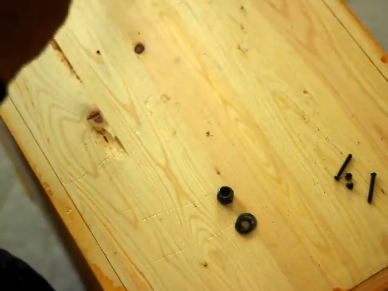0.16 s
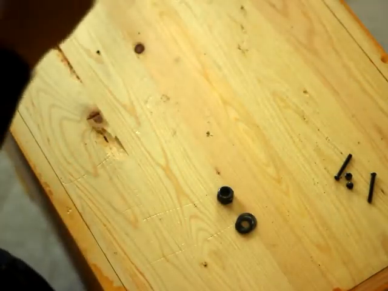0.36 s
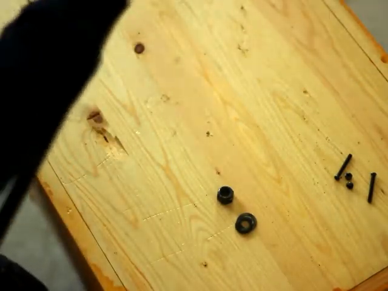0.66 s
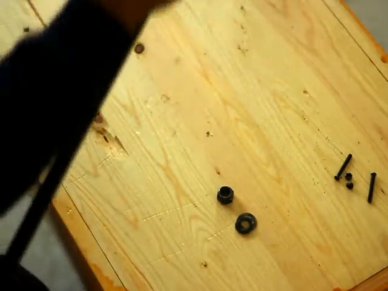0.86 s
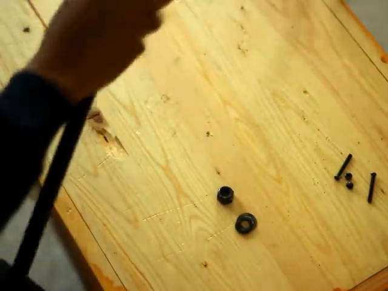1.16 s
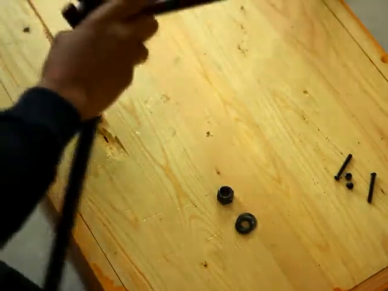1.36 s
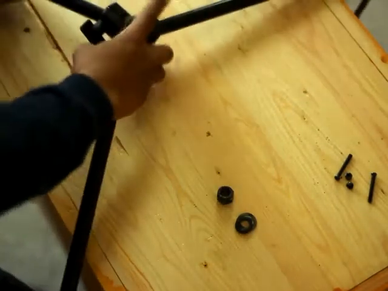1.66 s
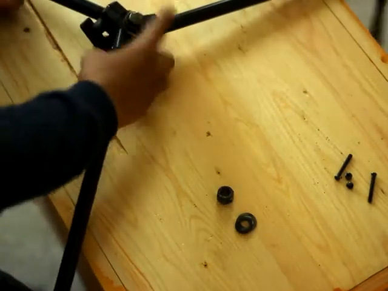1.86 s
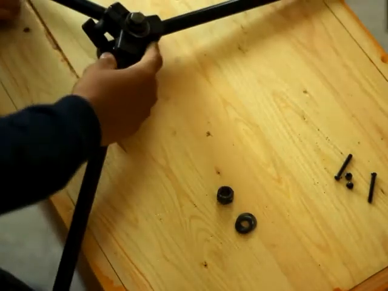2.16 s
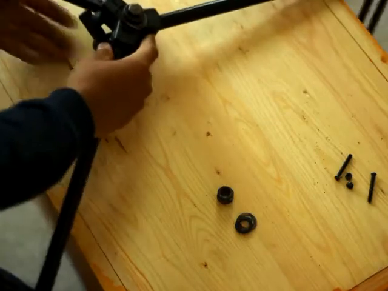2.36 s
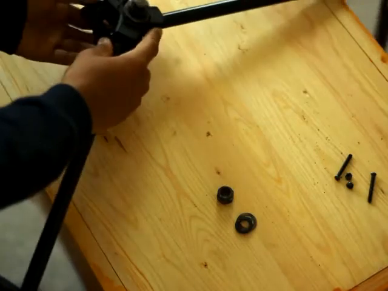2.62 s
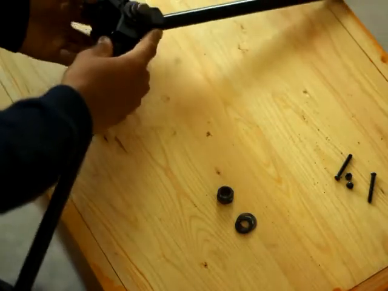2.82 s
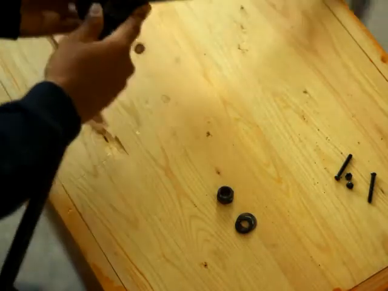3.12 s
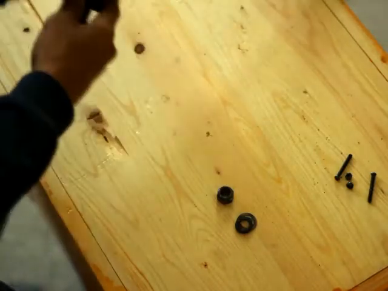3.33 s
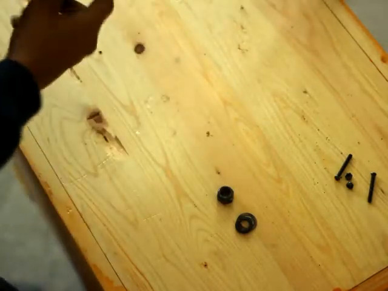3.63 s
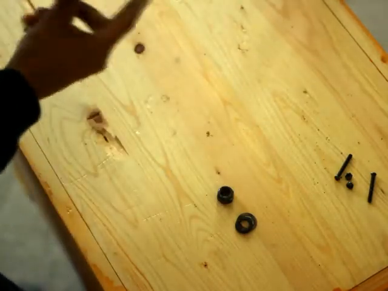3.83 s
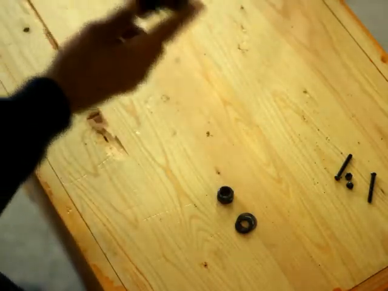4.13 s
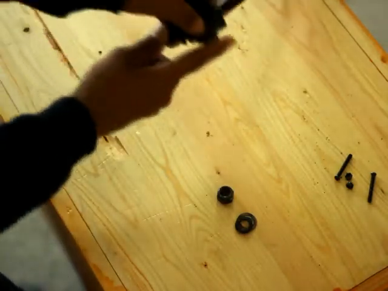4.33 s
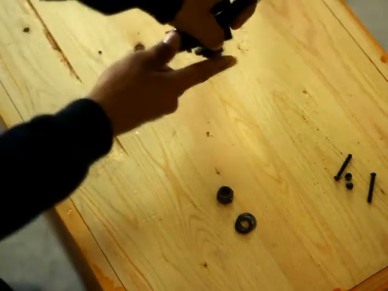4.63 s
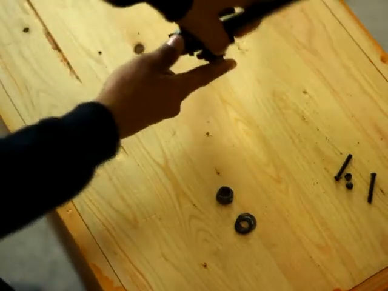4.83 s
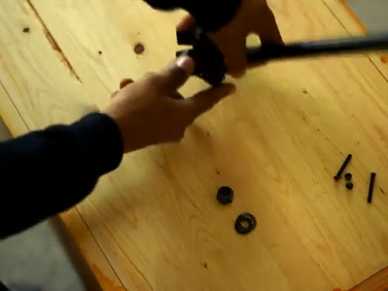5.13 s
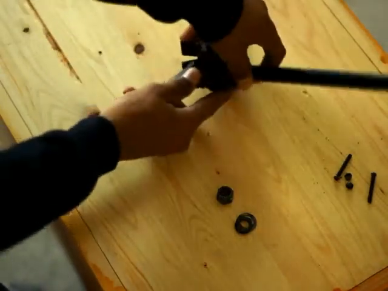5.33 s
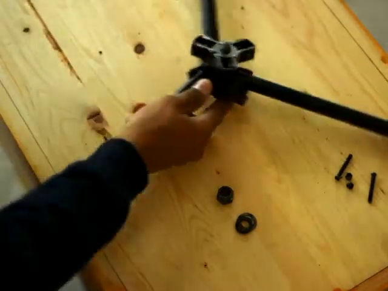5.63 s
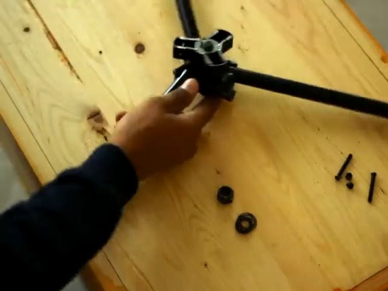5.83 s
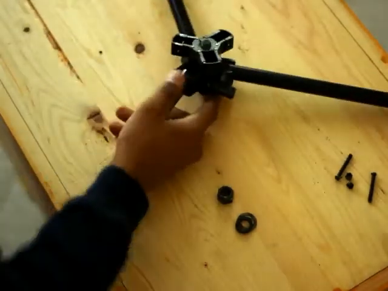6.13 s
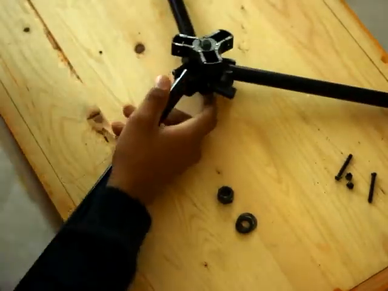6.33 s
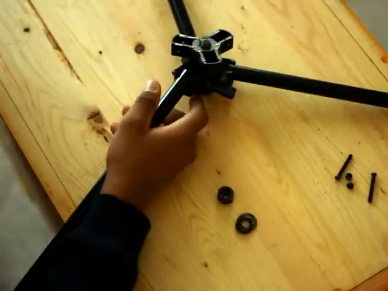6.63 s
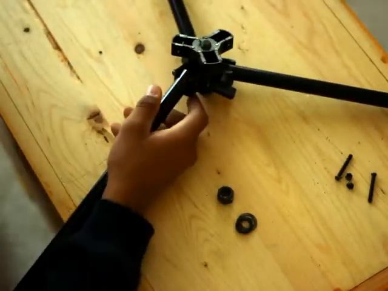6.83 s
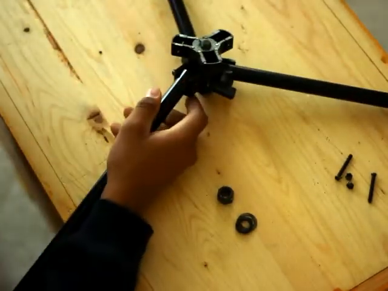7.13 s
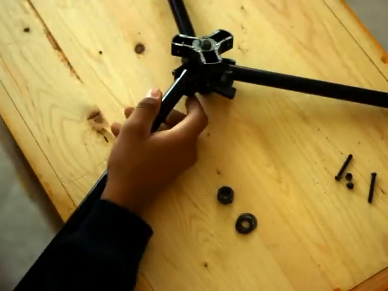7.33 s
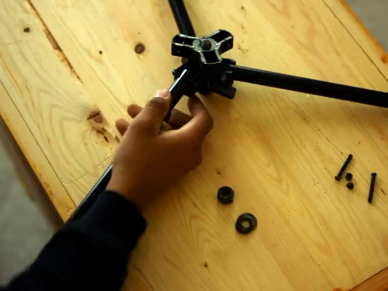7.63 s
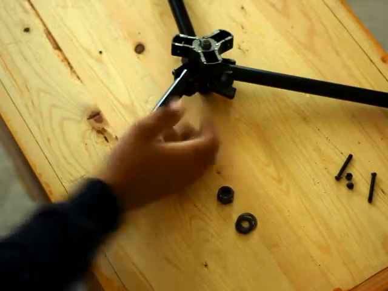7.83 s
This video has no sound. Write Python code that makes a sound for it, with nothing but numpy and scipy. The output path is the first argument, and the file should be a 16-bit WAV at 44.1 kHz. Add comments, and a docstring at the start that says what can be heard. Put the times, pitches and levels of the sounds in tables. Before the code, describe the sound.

Loose metal legs rattle in their hub, pause, then bang heavily onto wooden boards, ending with light taps and a small clear ring.

```python
"""Small room, wooden table, microphone close by: a three-legged stand of steel tubes is turned and set down.
Its ends knock on the boards as short thuds with ringing modes; the loose legs clatter and sing in their hub.
Near the end a small steel fitting pings with a few clear high modes. Sleeves and fingers are shaped noise,
and soft bumps are low decaying tones. A noise tail gives the room, a steady hiss lies underneath,
and the loudest blows overload the recorder."""
import sys
import numpy as np
from scipy import signal
from scipy.fft import rfft, irfft, next_fast_len
from scipy.io import wavfile
from scipy.ndimage import map_coordinates

SR = 44100
rng = np.random.default_rng(int(sys.argv[2]) if len(sys.argv) > 2 else 0)


def persist_wave(psi):
    """Save psi, clipped to +-1, as 16-bit WAV."""
    counts = np.round(np.clip(psi, -1, 1) * 32767).astype(np.int16)
    wavfile.write(sys.argv[1], SR, np.atleast_2d(counts).T)


N = 351477
T = np.arange(int(SR * 0.6)) / SR  # seconds after a blow

# All level_db columns are relative: the mix and the stereo balance scale them further.
# Steady hiss, spectrum shape: hz [Hz], density_db [dB per Hz]
HISS_SPECTRUM = [(15, -68), (25, -0.5), (126, -2.5), (381, -25), (556, -1.5), (954, -14), (1280, -6),
                 (1470, -5.5), (5820, -8), (10200, -6.5), (13100, -8.5), (14200, -14.5), (15800, -72.5)]
# Decay of the room: hz [Hz], t60_s [s]
ROOM_DECAY = [(100, 0.51), (300, 0.42), (1500, 0.3), (6000, 0.41), (14000, 0.22)]
# Rustle of sleeves, spectrum shape: hz [Hz], density_db [dB per Hz]
CLOTH_SPECTRUM = [(20, -17), (45, 2), (100, 3.5), (220, 3), (400, -3.5), (700, -7.5), (1500, -26),
                  (15000, -47)]
# Fingers rubbing on the tubes, spectrum shape: hz [Hz], density_db [dB per Hz]
RUB_SPECTRUM = [(100, -26), (400, 6), (570, 9.5), (850, 4.5), (1080, 8), (1500, 1.5), (2400, -2),
                (4000, -11.5), (15000, -21)]
# Strokes of the hands along the stand: start_s [s], length_s [s], cloth_db [dB], rub_db [dB]
HAND_STROKES = [(-.15,0.35,-45,-48.5), (.4,0.31,-70,-76), (1.055,.48,-31,-40), (1.442,0.42,-37,-42.5),
                (2.202,0.1,-65,-42), (2.114,0.6,-50,-54), (2.812,0.63,-47.5,-50.5), (3.5,0.87,-55.5,-57),
                (4.451,0.37,-37,-40.5), (5.348,0.23,-62,-40), (5.52,.55,-34,-35), (5.968,0.28,-43,-37),
                (6.126,0.68,-44.5,-50.5), (7.7,.2,-60,-59)]
# Soft bumps against the table: start_s [s], level_db [dB], pitch_hz [Hz], t60_s [s]
TABLE_BUMPS = [(0.072,-30,56.5,0.54), (.126,-41.5,91.3,0.63), (1.061,-27.5,85.4,0.26), (1.699,-35,82,0.18),
               (3.133,-38.5,93.4,0.32), (4.601,-35,82.7,0.74), (4.656,-27,123.5,0.35),
               (5.629,-10.5,79.5,0.073), (5.870,-4,71.4,0.014), (6.706,-30.5,52.7,0.13),
               (7.912,-29,132,0.096), (7.932,-25.5,60,0.1)]
# Touches of the small fitting: start_s [s], low_db [dB, low modes], middle_db [dB, near 6 kHz],
# high_db [dB, from 9 kHz up], touch_t60_s [s, damping by the fingers on top of each mode's own decay]
FITTING_PINGS = [(6.705, -36, -0.5, -15, 0.038), (6.712, -35, -24.5, -9.5, 0.7), (7, -41, -33.5, -58, 0.42),
                 (7.097, -41.5, -57, -68, 0.16), (7.295, -31, -36, -36, 4.5),
                 (7.464, -24, -29.5, -28, 0.11)]
# Modes of the fitting: pitch_hz [Hz], level_db [dB], t60_s [s]
FITTING_MODES = [(1740, -14, .2), (3378, -1, .45), (3420, -13, .3), (3747, -17, .5), (5911, -2, .33),
                 (5975, -4, .2), (7095, -20, .4), (7634, -17, .4), (8969, -9, .26), (9001, 0, .24),
                 (9098, -11, .24), (11170, -19, .35), (11960, -13, .22), (13170, -13, .25)]
# Pitched rings of the legs after contacts, brief or long, one row per mode:
# start_s [s], pitch_hz [Hz], level_db [dB], t60_s [s]
SINGING_LEGS = [(.144,1556,-33.5,0.22), (.506,2700,-36,0.026), (1.147,2110,-28,0.37),
                (1.149,15300,-21,0.33), (1.548,15050,-32,0.24), (1.329,587,-25,0.65), (1.377,1904,-27,0.27),
                (1.698,2450,-11,0.011), (1.703,1386,-28,0.31), (3.658,9460,-24.5,0.042),
                (3.659,2180,-31,0.16), (4.725,7600,-29,.14), (4.740,5940,-23.5,0.074),
                (5.132,599,-30.5,0.16), (5.451,3200,-36.5,0.33), (5.577,9800,-14,0.0088),
                (5.638,5917,-16.5,.25), (5.640,9330,-4,.11), (5.640,11200,-10.5,0.1),
                (5.643,4250,-7.5,0.062), (5.661,3200,-28,0.88), (5.885,3250,-29,0.27),
                (5.968,10150,-16.5,0.3), (5.969,15750,-6,.19), (5.972,3280,-4.5,0.06),
                (6.403,2600,-20,0.033), (6.433,2660,-15,0.027), (6.713,3760,-35.5,.5)]
# Neighbours of a singing mode: offset_hz [Hz], level_db [dB against that mode]
NEIGHBOUR_MODES = [(-36, -13.5), (36, -1.5), (109, -9)]
# Steel on steel: start_s [s], clank_db [dB, 2-7 kHz], clunk_db [dB, 0.6-2 kHz], sizzle_db [dB, above 7 kHz]
STEEL_CONTACTS = [(.143,-35,-33,-46), (0.504,-46,-41.5,-71), (0.98,-40,-36.5,-67), (1.062,-14,-8,-18),
                  (1.093,-27.5,-18,-20.5), (1.127,-16,-13.5,-20), (1.148,-9,-11,-7), (1.218,-28,-23,-26),
                  (1.284,-19,-36,-26.5), (1.331,-18.5,-18,-22), (1.376,-17,-13,-28), (1.548,-20.5,-21,-12),
                  (1.583,-22.5,-26,-21), (1.662,-26,-30.5,-37), (1.697,-10,-14.5,-46),
                  (1.704,-22,-26.5,-24), (1.917,-36,-35,-33), (1.976,-25.5,-34,-46), (2.809,-30,-26,-55),
                  (2.824,-19.5,-25,-29), (3.319,-36,-45.5,-62), (3.477,-32.5,-39.5,-59),
                  (3.531,-40,-34,-56), (3.641,-33,-30.5,-41), (3.659,-15,-22,-30), (3.884,-33,-35.5,-39.5),
                  (4.605,-31.5,-29.5,-31), (4.655,-13.5,-13.5,-20.5), (4.738,-22,-34,-30.5),
                  (4.873,-33.5,-33,-29), (5.131,-21,-21,-27), (5.296,-26.5,-31.5,-40), (5.43,-23,-21.5,-33),
                  (5.45,-21.5,-15.5,-31.5), (5.47,-22.5,-20.5,-25.5), (5.576,-26.5,-24.5,-38.5),
                  (5.626,-13,-1,-20.5), (5.641,-7.5,-30,-10.5), (5.675,-14.5,-7,-10.5),
                  (5.736,-8.5,-3.5,-15.5), (5.767,-15,-40,-15.5), (5.872,-20,-19,-22),
                  (5.885,-15.5,-47,-19.5), (5.968,-4.5,-10.5,-3.5), (6.011,-2,-4.5,-3),
                  (6.176,-30.5,-41,-27), (6.404,-13,-18.5,-26.5), (6.431,-20,-21.5,-24.5),
                  (6.702,-17,-23,-26.5), (6.902,-34,-29,-58), (7.464,-30,-42,-35.5)]
# Strongest modes of the tubes: pitch_hz [Hz], level_db [dB], t60_s [s, before damping by hand and contact]
TUBE_MODES = [(1066, -6, .35), (1450, -14, .35), (1965, -8, .35), (2094, -5, .45), (3200, -3, .3),
              (3275, -2, .35), (4300, -7, .25), (4690, -7, .3), (5938, -3, .35), (6535, -7, .25),
              (7058, -9, .4), (7912, 1, .35), (8053, -4, .3), (8394, -4, .3), (8780, 1, .3),
              (10087, 0, .25), (10740, -4, .35), (12800, 3, .35), (14538, 1, .25), (14975, 5, .3),
              (15050, 4, .35)]
# Tube ends on the tabletop: start_s [s], level_db [dB], pitch_hz [Hz, of the thud],
# boards_db [dB, ring of the boards against the thud]
TABLE_KNOCKS = [(0.885,-48,177,-19), (1.06,-12.5,593,3.5), (1.082,-18,428,5.5), (1.099,-15.5,598,1.5),
                (1.148,-21,408,4), (1.2,-30,220,4), (1.284,-16,190,-27), (1.328,-13.5,207,1.5),
                (1.381,-18,566,-2.5), (1.582,-20,178,8.5), (1.66,-22.5,211,6), (1.698,2,223,-17.5),
                (1.902,-29,220,-19), (1.966,-27,185,4.5), (2.646,-43,218,5.5), (2.821,-28.5,219,3.5),
                (2.855,-27.5,220,2), (3.132,-32.5,198,6.5), (3.653,-38,230,6.5), (3.885,-36.5,220,-8),
                (4.656,-13,191,0.5), (4.68,-17.5,205,3), (5.134,-28,185,9.5), (5.280,1,238,-17.5),
                (5.426,-12,412,-13), (5.449,-23,390,10.5), (5.468,-3,278,-15), (5.470,-20.5,648,-14),
                (5.577,-2,232,-10.5), (5.626,-3,360,-1), (5.644,2.5,407,-12.5), (5.686,-1.5,273,-5.5),
                (5.736,-0.5,244,-20), (5.747,3,383,-33), (5.769,-3.5,278,-10.5), (5.869,-8,183,3),
                (5.888,6.5,239,-14), (5.971,0.5,301,-8.5), (6.011,-8,419,-5.5), (6.029,-9.5,387,-19),
                (6.403,-20,330,-3), (6.43,-14.5,396,-8), (6.462,-20.5,340,-8), (6.557,-27,312,-25),
                (6.703,-26.5,207,-8), (6.903,-33,342,-3)]
# Modes of the tabletop with the stand on it: pitch_hz [Hz], level_db [dB], t60_s [s]
TABLETOP_MODES = [(134.3, -18, 0.26), (197.6, -3.5, 0.16), (233.4, -6, 0.37), (262, -17, 0.29),
                  (356, -26.5, 0.17), (405.8, -1.5, 0.13), (446.6, -11, 0.32), (507, 0, 0.08),
                  (526.5, -7.5, 0.27), (567, -0.5, 0.12), (617, -12, 0.098), (653, -18, 0.077),
                  (767, 3.5, 0.06), (821, -3, 0.065)]
# Unpitched ring of the boards, spectrum shape: hz [Hz], density_db [dB per Hz]
BOARDS_SPECTRUM = [(40, -28), (100, 9), (200, -5.5), (300, -17), (420, -31.5), (600, 10.5), (800, 3),
                   (950, -21), (2000, -24)]
# A hard blow keeps the tube pressed on the wood, which cuts the thud short: level_db [dB], t60_s [s]
THUD_DECAY_BY_LEVEL = [(-6.5, 0.079), (-2, 0.035)]

HISS_DB = -52
HOLD_CLOTH_DB, HOLD_RUB_DB = -56, -61.5  # hands that only hold the stand
STROKE_PEAK_SHARE = 0.49  # a stroke swells for this share of its length, then eases off
CRACK_DB, CRACK_DB_PER_S = 1.5, -14.5  # first crack: a loose, long rattle starts less sharply
FREE_T60_S, GRIP_HALVES_DB = 0.28, 19.5  # base decay of a free leg; this much lost sizzle halves it
PRESSED_T60_S = 0.15  # longest base decay after a 0 dB clank, which presses the legs together
TOP_HZ = 15750  # band limit of the recorder


def amp(db):
    """Decibels to gain."""
    return 10 ** (np.asarray(db) / 20)


def unit(x):
    """Scale to rms 1."""
    return x / np.sqrt(np.mean(x ** 2) + 1e-20)


def along(points, hz):
    """Read (Hz, value) points on a log frequency axis."""
    point_hz, values = np.transpose(points)
    return np.interp(np.log(hz + 1), np.log(point_hz), values)


def fade(t60, t=T):
    """Free decay: 60 dB in t60 seconds."""
    return 1000 ** (-t / np.maximum(t60, 1e-3))


def onset(time_s):
    """Exponential rise as the struck body gets moving."""
    return 1 - np.exp(-T / time_s)


def noise(spectrum, size):
    """Two unrelated noises of one colour, together of rms 1."""
    m = next_fast_len(size)
    gain = amp(along(spectrum, np.fft.rfftfreq(m, 1 / SR)))
    white = rng.standard_normal((2, m))
    return unit(irfft(rfft(white) * gain, m)[:, :size])


def spread(pair, width):
    """Left and right from a shared sound and a side part of opposite sign."""
    shared, side = pair[0], width * pair[1]
    return np.array([shared + side, shared - side]) / np.hypot(1, width)


def add(track, start_s, sound):
    """Mix a sound into the track at its start time."""
    start = max(round(start_s * SR), 0)
    part = track[:, start:start + sound.shape[-1]]
    part += sound[..., :part.shape[1]]


def ringing(modes):
    """One decaying complex oscillation per mode."""
    hz, level_db, t60 = np.transpose(modes)[:, :, None]
    phase = (2 * np.pi * (hz * T % 1)).astype(np.float32)
    envelope = (amp(level_db) * fade(t60)).astype(np.float32)
    return envelope * (np.cos(phase) + 1j * np.sin(phase))


def strike(bank, gains, scatter_db):
    """Two mixes of the modes; each blow lands elsewhere and draws new phases and weights."""
    shape = (2, len(bank))
    weights = gains * amp(scatter_db * rng.standard_normal(shape))
    weights = weights * np.exp(2j * np.pi * rng.random(shape))
    return (weights.astype(np.complex64) @ bank).imag


def hiss():
    """A steady, wide noise floor of fixed colour."""
    return amp(HISS_DB) * spread(noise(HISS_SPECTRUM, N), width=0.64)


def room(x):
    """A diffuse tail of noise in which every band dies at its own rate."""
    hz, t, bands = signal.stft(rng.standard_normal((2, SR)), SR, nperseg=256)
    decay = fade(along(ROOM_DECAY, hz)[:, None], t)
    tail = spread(signal.istft(bands * decay, SR, nperseg=256)[1], width=0.16)
    tail = np.pad(tail, ((0, 0), (SR // 150, 0)))  # the answer comes 1/150 s late
    return signal.fftconvolve(x, tail / np.linalg.norm(tail[0]), axes=1)[:, :N]


def handling():
    """Cloth and fingers slide unevenly over the tubes, swelling with each stroke."""
    t = np.arange(N) / SR
    cloth_gain, rub_gain = amp(HOLD_CLOTH_DB), amp(HOLD_RUB_DB)
    for start_s, length_s, cloth_db, rub_db in HAND_STROKES:
        speed = np.interp((t - start_s) / length_s, [0, STROKE_PEAK_SHARE, 1], [0, 1, 0])
        cloth_gain = np.hypot(cloth_gain, amp(cloth_db) * speed)
        rub_gain = np.hypot(rub_gain, amp(rub_db) * speed)
    catching = map_coordinates(rng.standard_normal(400), [t * 30])  # 30 random values a second
    cloth = cloth_gain * amp(2.3 * catching) * noise(CLOTH_SPECTRUM, N)
    rub = rub_gain * amp(1.8 * catching) * noise(RUB_SPECTRUM, N)
    return spread(cloth + rub, width=0.24)


def bumps():
    """The whole table sways in a low, dull, decaying note."""
    out = np.zeros((2, N))
    for start_s, level_db, hz, t60 in TABLE_BUMPS:
        sway = np.sin(2 * np.pi * hz * T) * fade(t60)
        add(out, start_s, amp(level_db) * sway * onset(0.00071))
    return out


def pings():
    """The fitting rings in a few clear modes; where it is touched decides which ones lead."""
    bank, out = ringing(FITTING_MODES), np.zeros((2, N))
    mode_hz = np.array(FITTING_MODES)[:, 0]
    for start_s, low_db, middle_db, high_db, touch_t60 in FITTING_PINGS:
        colour = [(3700, low_db), (5900, middle_db), (8900, high_db), (13000, high_db - 2.0)]
        ring = spread(strike(bank, amp(along(colour, mode_hz)), scatter_db=1), width=0.22)
        add(out, start_s, ring * fade(touch_t60) * onset(0.00049))
    return out


def singing():
    """A leg rings in a cluster of close modes that beat against each other."""
    out = np.zeros((2, N))
    for start_s, hz, level_db, t60 in SINGING_LEGS:
        neighbours = [(hz + offset_hz, weaker_db, t60) for offset_hz, weaker_db in NEIGHBOUR_MODES]
        bank = ringing([(hz, 0, t60)] + neighbours)
        add(out, start_s, spread(strike(bank, amp(level_db - 2), scatter_db=1), width=0.22))
    return out


def contact_colour(clank_db, clunk_db, sizzle_db, grip_db):
    """Spectrum of one steel contact as (Hz, dB); a hand's grip takes the upper clank away."""
    # a softer contact loses the very top first
    top_db = sizzle_db + 0.85 * np.clip(sizzle_db - clank_db + 0.5, -15, 6)
    return [(80, clunk_db - 38), (400, clunk_db + 2.5), (760, clunk_db + 3.5),
            (1100, clunk_db + 8.0), (1700, clunk_db + 4),
            (2700, clank_db + 1.0), (3900, clank_db - 0.5),
            (4900, clank_db - 0.18 * grip_db), (6500, clank_db + 0.5 - 0.68 * grip_db),
            (8500, sizzle_db + 3.0), (10500, sizzle_db + 0.5),
            (13800, top_db - 2.5), (15200, top_db - 7.0)]


def clatter(count=380):
    """Each contact cracks, leaves a wash of crowded weak modes, and rings the strong modes of the tubes."""
    # the legs are almost alike, so their modes beat
    twins = [(hz + 14, level_db - 2.5, t60) for hz, level_db, t60 in TUBE_MODES]
    modes = np.vstack([TUBE_MODES, twins])
    hz = np.linspace(80, 16000, count)
    bank, out = ringing(modes), np.zeros((2, N))
    for start_s, clank_db, clunk_db, sizzle_db in STEEL_CONTACTS:
        # a hand on the tube dulls and shortens its ring
        grip_db = max(clank_db - sizzle_db, 0)
        gripped_t60 = FREE_T60_S * 2 ** (-grip_db / GRIP_HALVES_DB)
        t60 = min(gripped_t60, PRESSED_T60_S / amp(clank_db))
        colour = contact_colour(clank_db, clunk_db, sizzle_db, grip_db)
        smooth_db = along(colour, hz)
        # modes with a node at the point of contact stay weak
        comb = np.cos(2 * np.pi * (hz / rng.uniform(1360, 3590) + rng.random()))
        crowd_db = np.clip(5 * rng.standard_normal(count), -14, 8)
        lumpy_db = smooth_db + 4 * comb + crowd_db
        level = np.sqrt(np.mean(amp(smooth_db) ** 2))
        # the loose joint chatters: 300 random values a second
        chatter = amp(3.2 * map_coordinates(rng.standard_normal(200), [T * 300], order=1))
        crack = amp(CRACK_DB + CRACK_DB_PER_S * t60) * fade(0.013)
        rattle = amp(-6.5) * chatter * fade(1.06 * t60)
        wash = level * noise(np.column_stack([hz, lumpy_db]), len(T)) * (crack + rattle)
        mode_gains = amp(along(colour, modes[:, 0]) - 22)
        ring = strike(bank, mode_gains, scatter_db=0) * fade(2.0 * t60)
        add(out, start_s, spread(ring + wash, width=0.3) * onset(0.00026))
    return out


def knocks():
    """A tube end gives the wood a thud of a few cycles, and the boards ring on."""
    bank, out = ringing(TABLETOP_MODES), np.zeros((2, N))
    mode_hz = np.array(TABLETOP_MODES)[:, 0]
    for start_s, level_db, hz, boards_db in TABLE_KNOCKS:
        t60 = np.interp(level_db, *np.transpose(THUD_DECAY_BY_LEVEL))
        sway = -np.cos(2 * np.pi * hz * T) * fade(t60) * onset(0.0014) ** 2
        thud = np.gradient(sway) * SR / (2 * np.pi * hz)  # the air follows the speed of the wood
        softness = 1 / np.hypot(1, (mode_hz / (1.48 * hz)) ** 2)  # a slow blow misses the higher modes
        pitched = amp(-4) * strike(bank, softness, scatter_db=0)
        unpitched = amp(-15.5) * noise(BOARDS_SPECTRUM, len(T)) * fade(0.12)
        ring = spread(pitched + unpitched, width=0.28) * onset(0.0017)
        add(out, start_s, amp(level_db + 3.5) * thud + amp(level_db + boards_db) * ring)
    return out


def scene():
    """Wood, hands and steel, all louder on the right, with the room's answer and a steady hiss."""
    wood = knocks() + bumps()
    steel = clatter() + singing() + pings()
    low = wood + amp(-10.5) * room(wood) + handling()
    high = steel + amp(-15) * room(steel)
    # left and right gains in dB
    return low * amp([[-4.4], [2.8]]) + high * amp([[-3.6], [2.6]]) + hiss() * amp([[-3.3], [2.5]])


def record(dry):
    """The recorder rounds off the highest peaks and cuts steeply above its band limit."""
    clipped = dry / (1 + np.abs(dry / 0.98) ** 5) ** (1 / 5)
    m = next_fast_len(N + SR // 4)
    keep = 1 / (1 + (np.fft.rfftfreq(m, 1 / SR) / TOP_HZ) ** 200)
    return irfft(rfft(clipped, m) * keep, m)[:, :N]


dry = scene()
out = record(dry)
persist_wave(out)
```